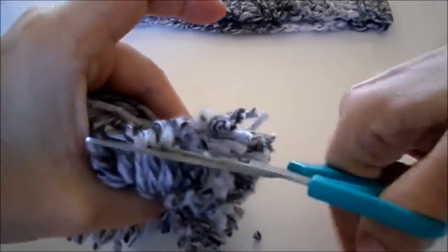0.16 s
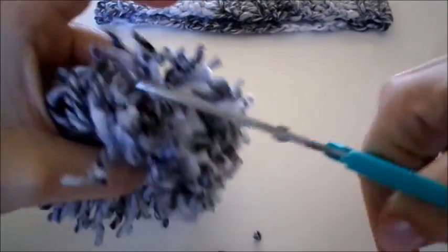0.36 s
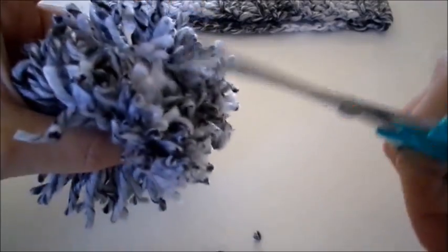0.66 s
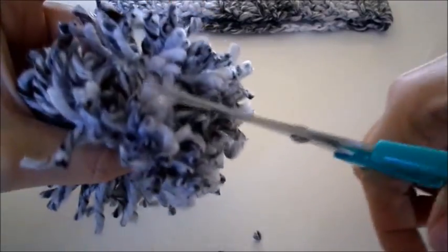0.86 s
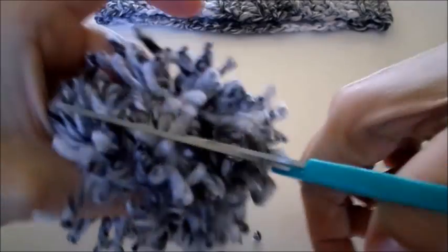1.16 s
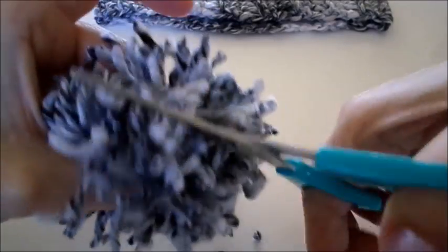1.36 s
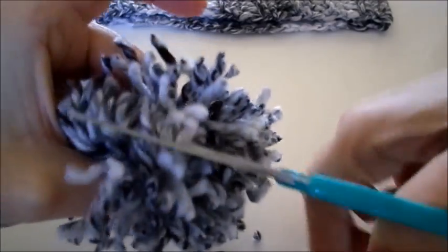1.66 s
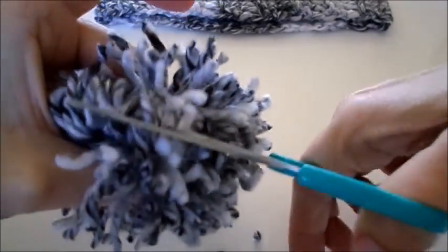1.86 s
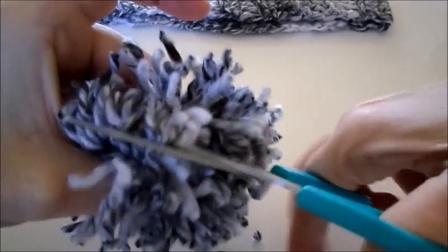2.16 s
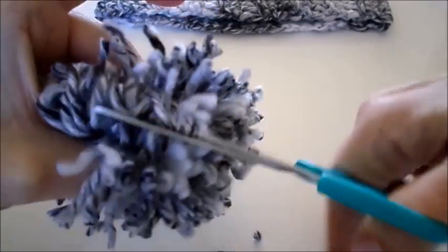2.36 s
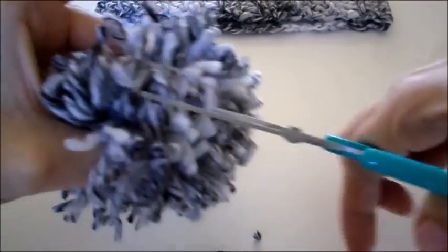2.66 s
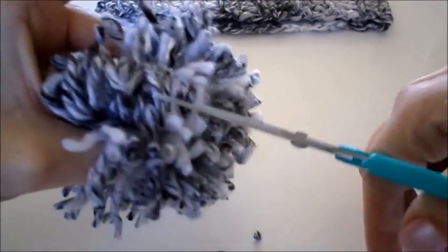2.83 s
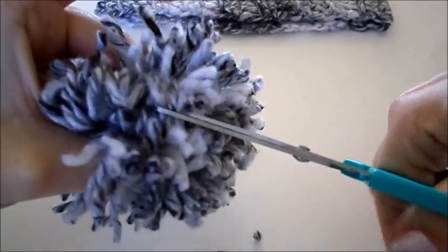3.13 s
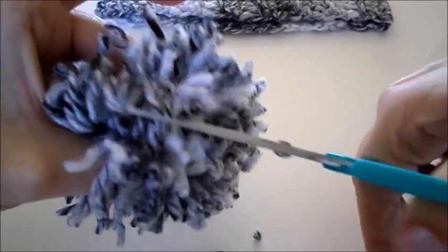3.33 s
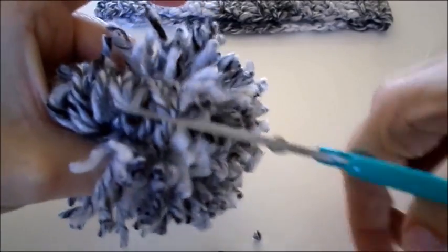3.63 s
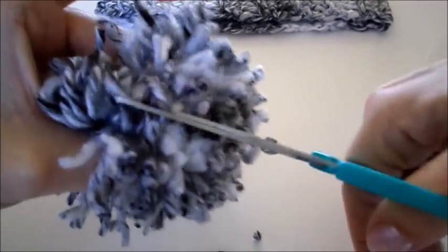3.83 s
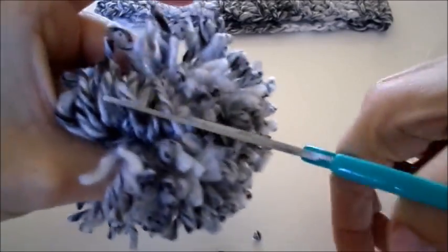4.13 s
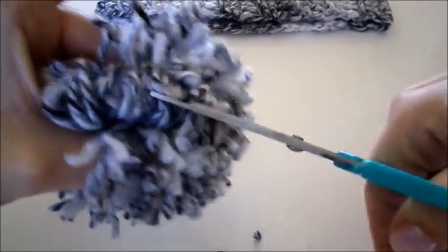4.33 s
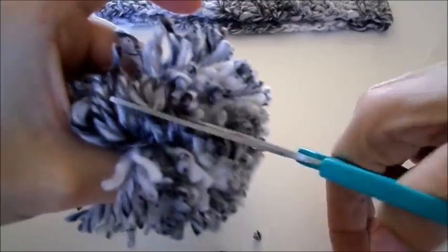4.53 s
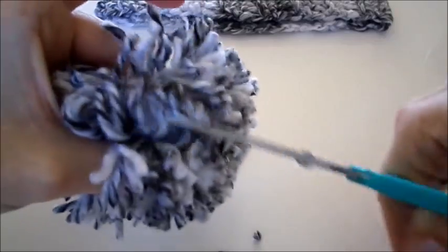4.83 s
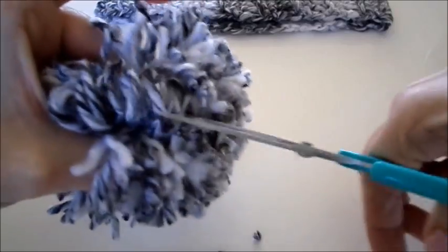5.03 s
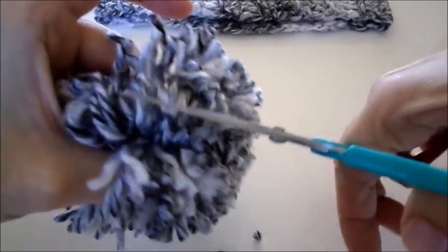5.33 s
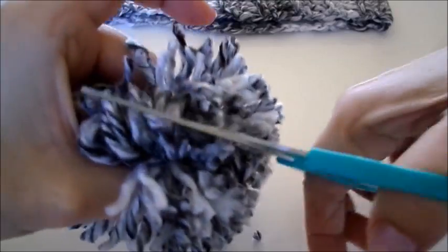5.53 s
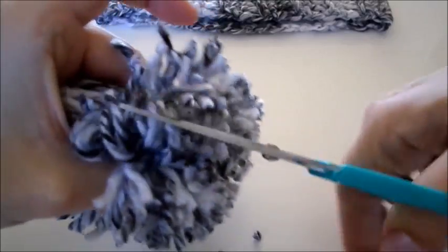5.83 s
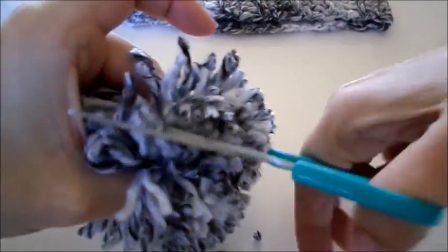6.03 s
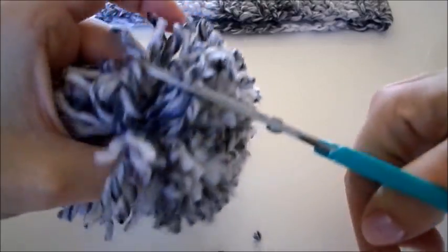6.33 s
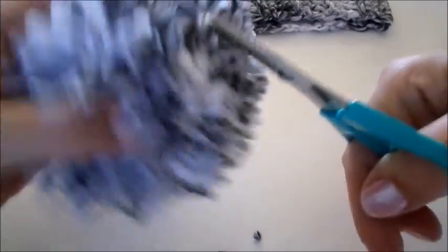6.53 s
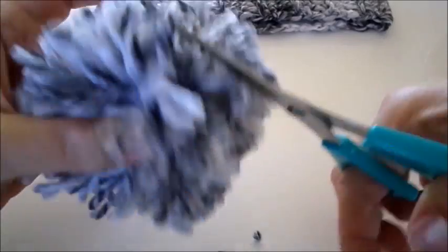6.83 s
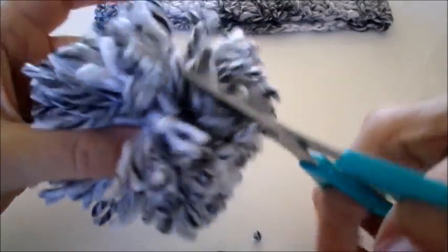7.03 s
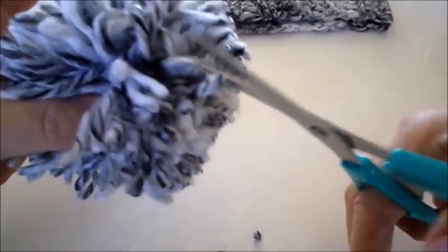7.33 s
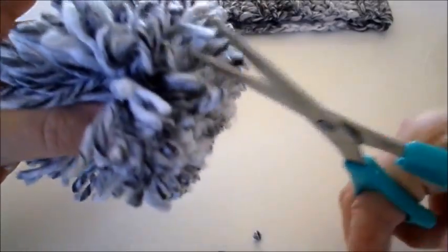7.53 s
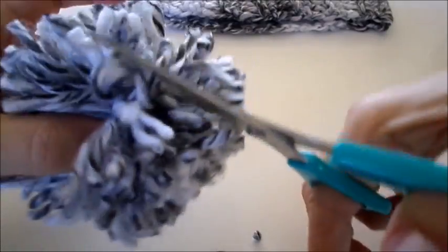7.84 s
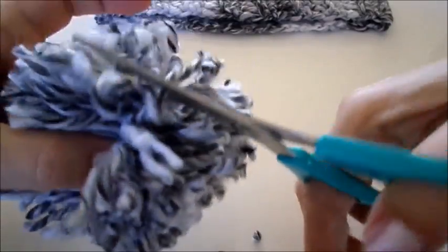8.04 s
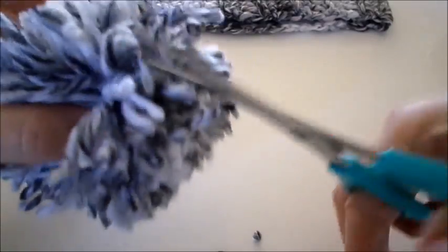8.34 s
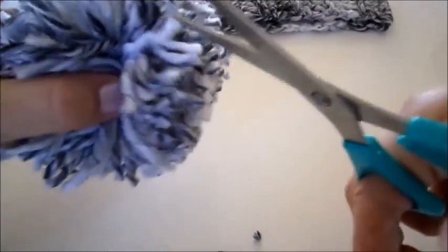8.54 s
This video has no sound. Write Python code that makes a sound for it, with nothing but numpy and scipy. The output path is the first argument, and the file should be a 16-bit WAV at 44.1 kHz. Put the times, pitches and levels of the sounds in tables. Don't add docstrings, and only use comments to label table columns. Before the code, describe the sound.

Close, crisp scissor snips through wool with hard plastic clacks, a quicker run midway, then sparse cuts, faint brushing and steady microphone hiss.

```python
import sys
import numpy as np
from scipy import signal
from scipy.fft import rfft, irfft
from scipy.io import wavfile
from scipy.ndimage import uniform_filter1d

SR = 44100
rng = np.random.default_rng(int(sys.argv[2]) if len(sys.argv) > 2 else 0)


def transcribe(signal):
    frames = np.atleast_2d(signal).T
    limited = np.clip(frames, -1, 1)
    pcm = np.round(limited * 32767).astype(np.int16)
    wavfile.write(sys.argv[1], SR, pcm)


def field_ratio(decibels):
    return 10 ** (np.asarray(decibels, dtype=float) / 20)


N = 383229
T = np.arange(N) / SR


def unit(x):
    return x / np.sqrt(np.mean(x ** 2))


def ring(x, hz, width_hz):
    return signal.lfilter(*signal.iirpeak(min(hz, .45 * SR), hz / width_hz, fs=SR), x)


def steep(x, hz, width_hz):
    return ring(ring(x, hz, width_hz), hz, width_hz)


def add(out, start_s, sound):
    i = int(start_s * SR)
    out[i:i + len(sound)] += sound[:N - i]


def walk(rate_hz):
    hold = int(SR / rate_hz)
    steps = np.repeat(rng.standard_normal(N // hold + 1), hold)
    return unit(uniform_filter1d(steps, hold)[:N])


def swell(start_s, end_s, rise_db_per_s, fall_db_per_s, hold_db_per_s=0):
    climb_db = rise_db_per_s * (T - start_s)
    drop_db = fall_db_per_s * (end_s - T)
    lean_db = hold_db_per_s * (np.clip(T, start_s, end_s) - (start_s + end_s) / 2)
    return field_ratio(np.maximum(np.minimum(np.minimum(climb_db, drop_db), 0) + lean_db, -120))


def touch(peak_s, rise_s, fall_s):
    range_db = 20.5
    return swell(peak_s, peak_s, range_db / rise_s, range_db / fall_s)


def fibres(per_s=9000, scatter_db=3.5, most_db=14):
    chance = rng.random((3, N))
    size_db = np.minimum(-scatter_db * np.log(chance[2] + 1e-9), most_db)
    return (chance[0] < per_s / SR) * np.sign(chance[1] - .5) * field_ratio(size_db)


# start_s, length_s, low_ring_db, high_minus_low_db, top_minus_low_db
CLOSING_STROKES = [(.142, .056, -33.5, 2, -3.5), (2.915, .043, -39, 3, -3.5), (3.346, .024, -44, 1, -13),
                   (3.378, .022, -51, 7.5, -10), (3.759, .02, -45, 0, -13), (3.785, 0.029, -38.5, -2, -11),
                   (4.175, 0.014, -37, 0, -16), (4.195, .012, -38, 0, -12), (4.207, .013, -32, 1, -13),
                   (4.574, .013, -36.5, 0, -3), (4.606, .011, -42, 2.5, -12), (5.604, .022, -42, 3, -14),
                   (5.626, .074, -34, -3, -16), (6.054, .04, -38, 3, -6), (7.015, .03, -40.5, 3, -14),
                   (7.054, .025, -29.5, -9, -18), (8.09, 0.054, -36, 3, -9)]


def stroke_gains():
    gains = np.zeros((3, N))
    for start_s, length_s, low_db, high_db, top_db in CLOSING_STROKES:
        shape = swell(start_s, start_s + length_s, 3300, 1900, 40)
        gains += shape * field_ratio([[low_db], [low_db + high_db], [low_db + top_db]])
    return gains


# peak_s, rise_s, fall_s, low_ring_db, high_minus_low_db
LIGHT_BRUSHES = [(.135, 0.044, 0.027, -42, 5.5), (.34, .012, .08, -47, -3), (.915, .05, 0.046, -65, 11),
                 (.985, 0.036, 0.069, -56.5, 2), (1.1, 0.071, .12, -56, 7), (1.415, 0.051, 0.055, -43, 4),
                 (1.63, .03, .03, -56.5, 8.5), (1.905, 0.094, 0.081, -47, 1.5),
                 (2.075, .03, 0.054, -62, 12), (2.284, 0.055, 0.082, -49, 2.5), (2.5, .015, .1, -57.5, 5),
                 (3.82, .02, .06, -45, 0.5), (4.165, 0.046, .02, -51.5, 0), (4.228, .01, 0.068, -43.5, 4),
                 (4.825, .005, .04, -50, 7), (5.705, .01, .04, -48, 2), (5.112, .025, .04, -54, 2),
                 (5.43, 0.067, .08, -59, 5.5), (7.01, .04, .02, -46, 3), (6.04, .07, .02, -62, 1),
                 (6.748, .005, .04, -45.5, 7), (7.212, .008, 0.056, -43.5, -4), (8.155, .01, 0.061, -43, 6),
                 (8.278, 0.011, 0.057, -43, -5.5)]


def brush_gains():
    gains = np.zeros((3, N))
    for peak_s, rise_s, fall_s, low_db, high_db in LIGHT_BRUSHES:
        levels_db = [[low_db], [low_db + high_db], [low_db + high_db / 2 - 10]]
        gains += touch(peak_s, rise_s, fall_s) * field_ratio(levels_db)
    return gains


# pitch_hz, width_hz, level_db
LOW_MODES = [(2600, 550, -3), (3157, 310, -0.5), (4200, 740, 7.5), (5540, 390, 2), (6000, 1100, -1.5)]
# pitch_hz, width_hz, level_db
HIGH_MODES = [(6880, 260, -3), (7980, 1160, 9), (9990, 680, 1), (10550, 900, -19)]
# pitch_hz, width_hz, level_db
TOP_MODES = [(13400, 600, -5.5), (15200, 490, 17.5)]


def shearing(strokes, patchy_db=2.2, shared_db=1.3):
    out = np.zeros(N)
    snaps = fibres()
    bite = field_ratio(shared_db * walk(180))
    for gain, modes in zip(strokes + brush_gains(), (LOW_MODES, HIGH_MODES, TOP_MODES)):
        group = np.zeros(N)
        for hz, width_hz, db in modes:
            group += field_ratio(db + patchy_db * walk(90)) * unit(steep(snaps, hz, 1.9 * width_hz))
        out += gain * unit(group * bite)
    return out * field_ratio(-0.5)


# peak_s, level_db, centre_hz, length_ms
STRANDS = [(0.197, -21, 5600, 3.5), (2.954, -25, 5100, 1.2), (2.9545, -28, 8300, 1.5),
           (2.965, -24.5, 5700, 2.2), (3.361, -34.5, 7400, 6.8), (3.796, -23.5, 5700, 1.3),
           (4.217, -22, 8000, 2.5), (4.584, -27, 4600, 3.1), (5.699, -25, 5200, 1.3),
           (.3325, -42, 6000, .5), (6.0942, -21, 7500, 1.9), (6.057, -33, 7800, 5.),
           (6.093, -37, 13000, 2.), (7.074, -40, 2200, 5.), (3.74, -43, 9700, 5.5), (8.119, -27, 8300, 3.2),
           (8.138, -17, 4160, 3.9), (8.1385, -15, 8600, 1.3), (0.22, -5, 9570, 0.37),
           (3.5287, -29, 8200, 1.6), (5.65, -29, 8000, 2.3), (5.672, -29, 10000, 3.8),
           (.2168, -17, 7500, 0.66), (.197, -25, 9500, 4)]


def crunches():
    out, t = np.zeros(N), np.arange(-600, 400) / SR
    for peak_s, db, hz, length_ms in STRANDS:
        shape = np.exp(-np.abs(t) * 1000 / length_ms / np.where(t < 0, 1, .45))
        noise = rng.standard_normal(len(t))
        burst = shape * (steep(noise, hz, .22 * hz) + .25 * steep(noise, 6500, 7996))
        level = np.sqrt(np.sum(shape ** 2) / np.sum(burst ** 2))
        add(out, peak_s + t[0], field_ratio(db) * burst * level)
    return out


# pitch_hz, width_hz, level_db
YARN_MODES = [(650, 500, -6), (1750, 500, -11), (3500, 500, -10)]
# peak_s, rise_s, fall_s, level_db
FINGER_SWISHES = [(.93, .1, .1, -58), (1.03, .06, 0.092, -53.5), (1.11, .1, .15, -53.5),
                  (5.116, .026, .03, -50), (5.46, .14, .05, -53.5), (8.145, 0.047, 0.035, -41.5)]


def swish(strokes):
    gain = field_ratio(-21) * strokes[0]
    for peak_s, rise_s, fall_s, db in FINGER_SWISHES:
        gain = gain + field_ratio(db) * touch(peak_s, rise_s, fall_s)
    grains = fibres(per_s=6000)
    rub = unit(steep(grains, 1500, 2800))
    for hz, width_hz, db in YARN_MODES:
        rub = rub + field_ratio(db + 4 * walk(70)) * unit(steep(grains, hz, width_hz))
    return gain * unit(rub * field_ratio(1.8 * walk(120)))


def knocks(table, lift_db, contact_ms, main_width_hz, rough):
    out, t = np.zeros(N), np.arange(500) / SR
    jolt = np.exp(-t / 0.00019) - 0.095 * np.exp(-t / 0.0012)
    thud = uniform_filter1d(jolt, size=9, mode="constant")
    for start_s, db, hz, low_db, top_db, thud_db in table:
        blow = rough * np.exp(-t * 1000 / contact_ms) * rng.standard_normal(len(t))
        blow[0] = 1
        main = steep(blow, hz, main_width_hz)
        main += 0.32 * steep(blow, 0.844 * hz, 1500) + 0.045 * steep(blow, 1.154 * hz, 1200)
        low = sum(field_ratio(d) * steep(blow, f, 2.25 * w) for f, w, d in LOW_MODES)
        top = steep(blow, 17595, 2600) + .4 * steep(blow, 16000, 2600)
        for part, part_db in ((main, 0), (low, low_db), (top, top_db), (thud, thud_db)):
            add(out, start_s + .0002, field_ratio(db + lift_db + part_db) * part / np.abs(part).max())
    return out


# start_s, peak_db, main_hz, low_minus_main_db, top_minus_main_db
HANDLE_CLACKS = [
    (0.2185, 0, 7370, -17.5, -43.5),
    (2.9674, 1, 7710, -17, -29),
    (3.4019, -2, 7710, -20.5, -20),
    (4.62, 0, 8360, -24, -40),
    (6.11, -11, 7300, -12, -40),
    (7.0815, -9, 7900, -18, -32),
    (8.1433, -5.5, 7700, -32, -36),
]


def clacks():
    table = [(*row, -21.5 + 1.5 * row[1]) for row in HANDLE_CLACKS]
    return knocks(table, lift_db=7.5, contact_ms=0.46, main_width_hz=1500, rough=0.43)


# start_s, peak_db, main_hz, low_minus_main_db, top_minus_main_db
PIVOT_CLICKS = [
    (3.1202, -10.5, 8700, -17.5, 5),
    (3.5273, -18, 8250, -9, 1),
    (6.7413, -17.5, 8300, -11, -12),
]


def pivot_clicks():
    table = [(*row, -41) for row in PIVOT_CLICKS]
    return knocks(table, lift_db=2.5, contact_ms=0.63, main_width_hz=1630, rough=0.31)


# start_s, peak_db, low_minus_main_db, thud_minus_main_db
SMALL_TICKS = [(0.0892, -32.5, -13, -32.5), (0.3328, -46, 3, -22), (0.7133, -36, -14, -18),
               (0.998, -38, -13, -22), (1.0258, -40, -15, -16), (1.4333, -36, -2, -18),
               (1.6282, -46, -15, -20), (1.97, -45, -12, -20), (2.1409, -37.5, 0, 1.5),
               (2.1594, -59, -10, 3.5), (2.1817, -47, -9, 0), (2.3094, -44, -13, -12),
               (2.5007, -40.5, -18, -21), (2.6263, -38.5, -3, -18), (2.6653, -41, -3, -18),
               (2.6738, -38, -16, -22), (2.7144, -49, -18.5, -23), (3.796, -21.5, -17, -16),
               (4.8221, -28, 0, -30), (4.831, -36, -5, -22), (4.9532, -46, -14, -11.5),
               (5.1222, -41, -2, -5), (5.9345, -48, -2, -20), (5.957, -49, -3, -20),
               (6.0357, -47, -20.5, -21), (6.0762, -24, -8, -18), (7.2104, -46, -8.5, -15),
               (8.277, -39.5, -6, -23)]


def ticks():
    table = [(s, db, 7990, low_db, -23, thud_db) for s, db, low_db, thud_db in SMALL_TICKS]
    return knocks(table, lift_db=3, contact_ms=0.14, main_width_hz=1700, rough=0.14)


# start_s, level_db, pitch_hz, t60_s
TABLE_BUMPS = [(2.14, -40.5, 230, 0.13), (2.145, -47.5, 101, 0.18), (8.135, -36, 233, 0.049),
               (8.137, -45, 70, .08), (8.14, -40, 480, .03), (0.25, -50.5, 240, 0.031),
               (7.082, -39, 700, .03), (4.62, -38.5, 1300, 0.016), (4.62, -32, 700, .02),
               (3.402, -39, 600, .025), (6.11, -40.5, 1370, 0.017), (2.967, -36, 1400, 0.014)]


def bumps():
    out, t = np.zeros(N), np.arange(9000) / SR
    for start_s, db, hz, t60_s in TABLE_BUMPS:
        rough = 1 + .5 * unit(uniform_filter1d(rng.standard_normal(len(t)), size=150))
        decay = np.exp(-np.log(1000) * t / t60_s)
        add(out, start_s, field_ratio(db) * rough * np.sin(2 * np.pi * hz * t) * decay)
    return out


def radiated(table, lift_db, shift, width_hz):
    out = np.zeros(N)
    for start_s, db, hz, *_ in table:
        hump = steep(signal.unit_impulse(300), shift * hz, width_hz)
        add(out, start_s + .0004, field_ratio(db + lift_db) * hump / np.abs(hump).max())
    return out


# delay_ms, level_db
WALL_ECHOES = [(6.4, -27), (10., -28), (11.5, -35), (13.7, -21.5), (19.3, -34.5), (21.5, -24.5),
               (26.2, -33), (36., -52)]
# pitch_hz, level_db, t60_s
ROOM_TAIL = [(690, -49, 0.1), (1500, -42.5, 0.49), (3000, -41, .25), (4750, -44, 0.12), (6000, -47.5, 0.39),
             (7520, -40.5, 0.37), (9000, -47, .27), (11010, -68.5, 0.15), (14000, -48, 0.22)]


def room(x, onset_s=0.0062):
    t = np.arange(int(.5 * SR)) / SR
    taps = np.zeros(len(t))
    for delay_ms, db in WALL_ECHOES:
        taps[int(delay_ms * SR / 1000)] = field_ratio(db)
    rough_wall = np.exp(-t[:200] / .001) * rng.standard_normal(200)
    echoes = np.convolve(taps, rough_wall / np.linalg.norm(rough_wall))[:len(t)]
    response = steep(echoes, 7350, 6000)
    onset = 1 - np.exp(-(t / onset_s) ** 2)
    for hz, db, t60_s in ROOM_TAIL:
        band = unit(steep(rng.standard_normal(len(t)), hz, .3 * hz + 600))
        response += field_ratio(db - 15.5) * band * np.exp(-np.log(1000) * t / t60_s) * onset
    return signal.fftconvolve(x, response)[:N]


# pitch_hz, level_db (per Hz)
HISS_SPECTRUM = [(30, -8), (75, -7), (100, -4), (330, -2.5), (1500, -10), (5420, -15), (8480, -13),
                 (16200, -22.5)]
# time_s, level_db
FLOOR_SAG = [(0, 0), (2.95, 0), (3.2, -2.5), (3.65, -2.5), (3.95, 0), (6.1, -.5), (6.3, -1), (6.6, .5),
             (7.2, -1.5), (7.5, 0), (8.69, 0)]


def hiss(level_db=-54, flicker_db=.45):
    hz, db = np.transpose(HISS_SPECTRUM)
    f = np.fft.rfftfreq(N, 1 / SR) + 1e-3
    colour = field_ratio(np.interp(np.log(f), np.log(hz), db))
    noise = unit(irfft(rfft(rng.standard_normal(N)) * colour, N))
    sag_db = np.interp(T, *np.transpose(FLOOR_SAG))
    return (noise + 0.66 * steep(noise, 8550, 790)) * field_ratio(level_db + sag_db + flicker_db * walk(20))


def scene():
    strokes = stroke_gains()
    near = shearing(strokes) + swish(strokes) + crunches() + ticks()
    to_walls = radiated(HANDLE_CLACKS, 8.3, 0.91, 5000) + radiated(PIVOT_CLICKS, 9.4, 1.007, 1800)
    walls = room(to_walls + field_ratio(-5) * near)
    return (clacks() + pivot_clicks() + near + walls + bumps() + hiss())[None]


TOP_HZ = 15850
# centre_s, from_hz
THIN_FRAMES = [(.467, 3000), (.723, 1500), (.916, 1000), (.98, 1000), (1.032, 4000), (2.075, 300),
               (2.114, 1000), (2.16, 1500), (2.261, 1000), (2.438, 2500), (2.902, 9000), (2.933, 200),
               (3.177, 800), (3.239, 300), (3.647, 3000), (3.741, 1000), (4.255, 800), (4.339, 1000),
               (5.676, 6000), (5.299, 1500), (5.46, 2000), (5.512, 300), (6.042, 11500), (6.28, 1500),
               (6.73, 2000), (6.765, 300), (6.785, 1500), (7.602, 300), (7.753, 1000), (8.081, 10500)]
# lag_s, from_hz, to_hz, weakest_blow_db
BLOW_THINNING = [(-.011, 300, 3000, -11), (-.011, 11000, 15500, -30), (.013, 10500, 16000, -30)]


def thin(x, size=1880, mask_hz=2500):
    f, t, lines = signal.stft(x, SR, "cosine", size)
    around = uniform_filter1d(np.abs(lines), int(2 * mask_hz / f[1]), axis=0)
    band = (f / 300).astype(int)
    cut_db = -3 + 4 * rng.standard_normal((80, len(t)))[band]
    knock_rows = list(HANDLE_CLACKS) + list(PIVOT_CLICKS)
    blows_s = np.array([row[0] for row in knock_rows])
    at_blow = np.abs(t[:, None] - blows_s).min(1) < size / SR / 2
    cut_db[:, at_blow] = -99
    keep = (f[:, None] < 11200) | (np.abs(lines) > around * field_ratio(cut_db))
    y = signal.istft(lines * keep, SR, "cosine", size)[1][:N]

    frames = [(s, from_hz, TOP_HZ, 4.5) for s, from_hz in THIN_FRAMES]
    for s, db, *_ in knock_rows:
        for lag_s, from_hz, to_hz, weakest_db in BLOW_THINNING:
            if db > weakest_db:
                frames.append((s + lag_s, from_hz, to_hz, 8))
    for s, from_hz, to_hz, over_mean_db in frames:
        half = int(min(size / 2, np.abs(s - blows_s).min() * SR))
        window = np.sin(np.pi * np.arange(2 * half) / (2 * half))
        f = np.fft.rfftfreq(2 * half, 1 / SR)
        frame = slice(int(s * SR) - half, int(s * SR) + half)
        lines = rfft(y[frame] * window)
        mean = uniform_filter1d(np.abs(lines), int(mask_hz / f[1]))
        weak = np.abs(lines) < field_ratio(over_mean_db) * mean
        y[frame] -= window * irfft(lines * weak * (f > from_hz) * (f < to_hz), 2 * half)
    return y


def roll_off(x):
    return signal.sosfilt(signal.butter(12, 16300, fs=SR, output="sos"), x)


def record(dry):
    top_cut = signal.ellip(8, .3, 45, TOP_HZ, fs=SR, output="sos")
    phone = thin(signal.sosfiltfilt(top_cut, np.clip(dry[0], -1, 1)))
    mix = np.clip(phone, -1, 1)[None]
    return roll_off(mix)


dry = scene()
out = record(dry)
transcribe(out)
```